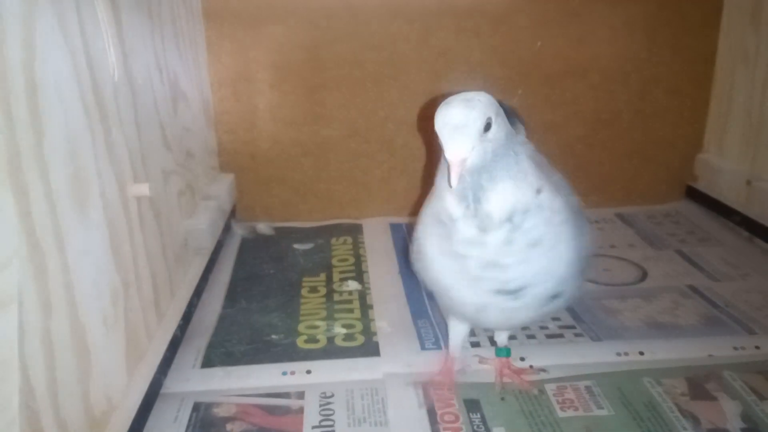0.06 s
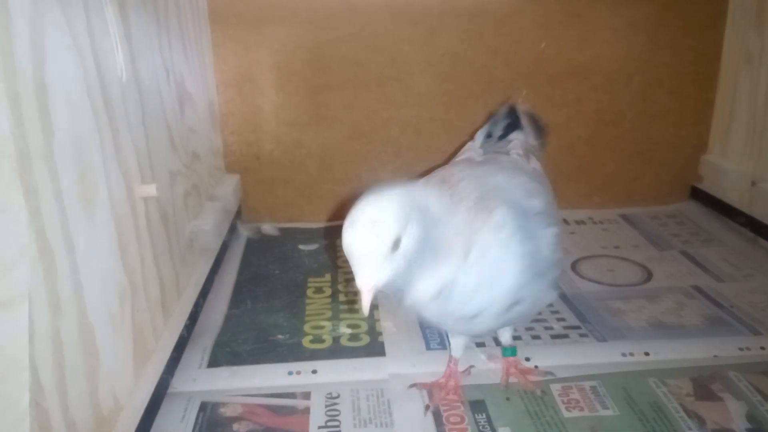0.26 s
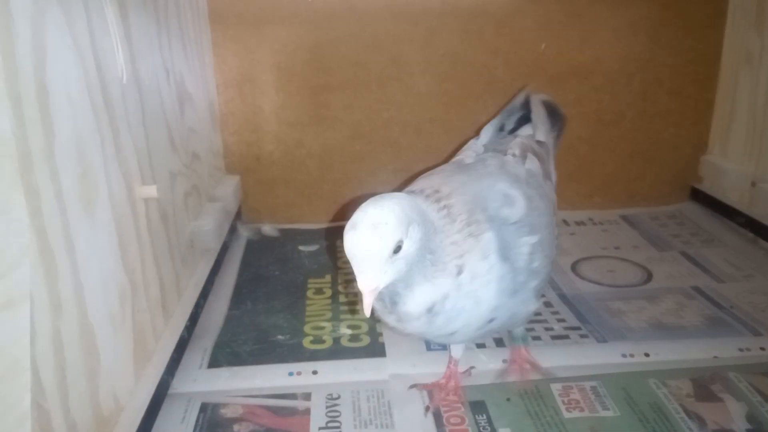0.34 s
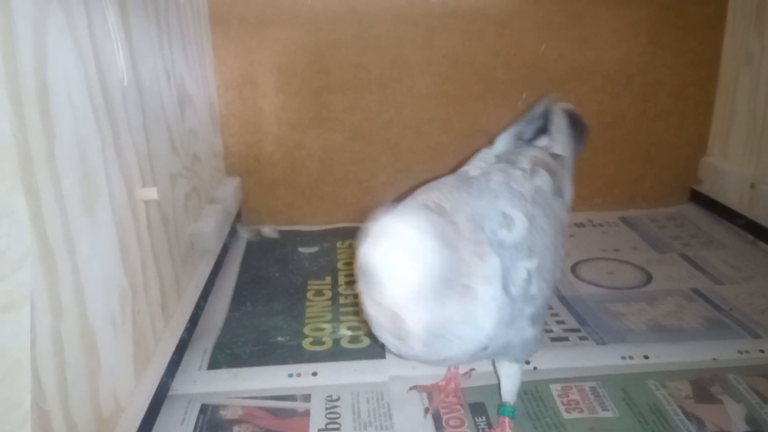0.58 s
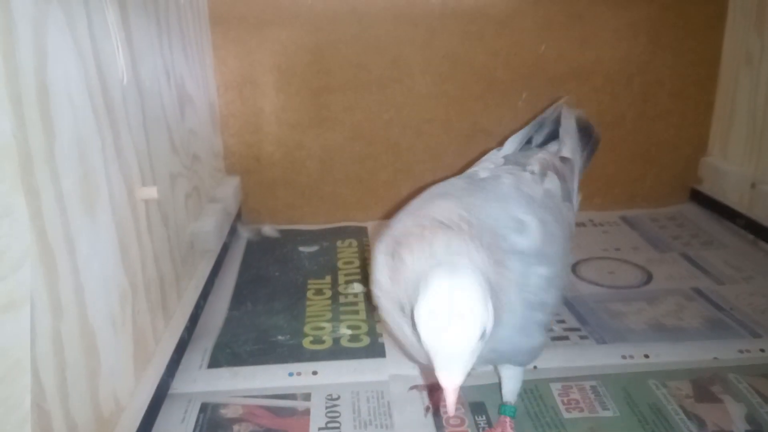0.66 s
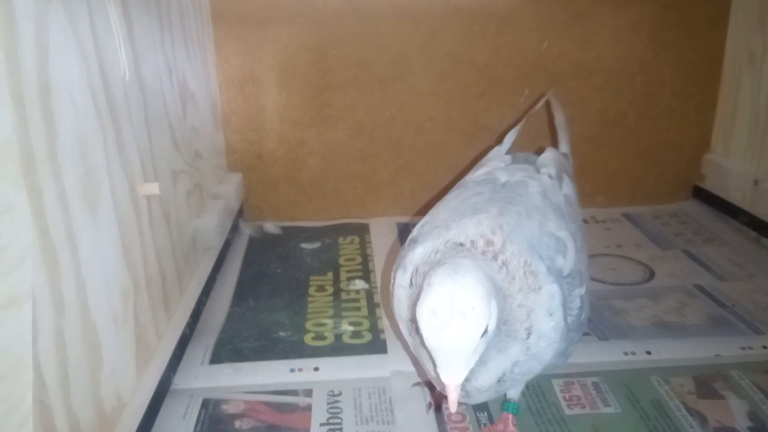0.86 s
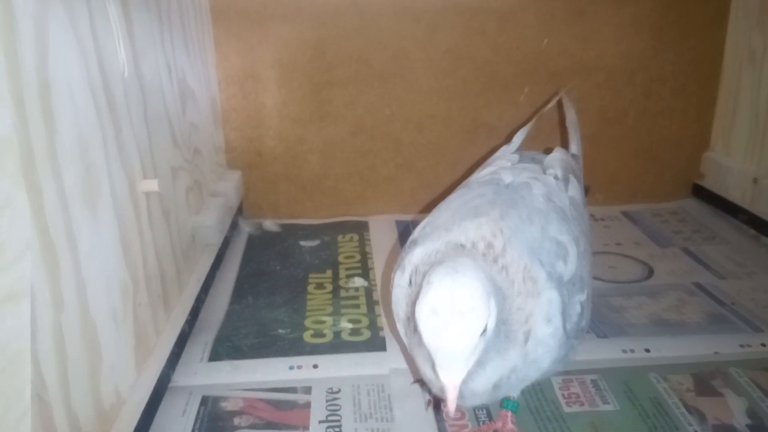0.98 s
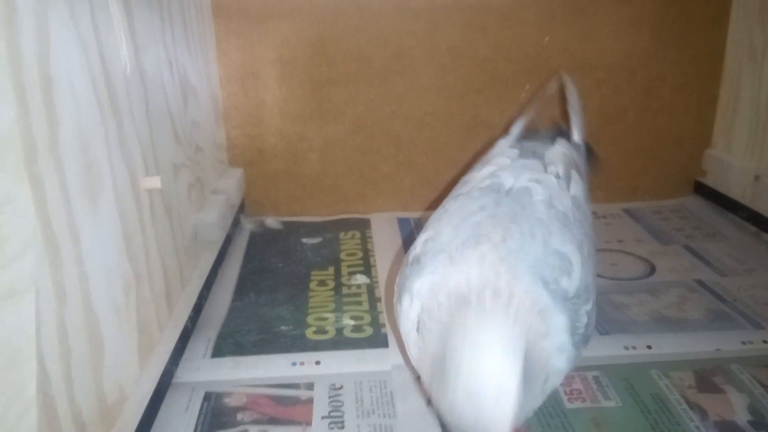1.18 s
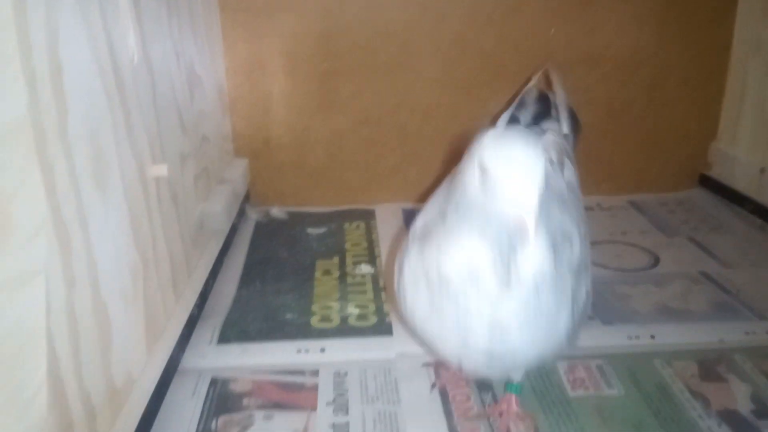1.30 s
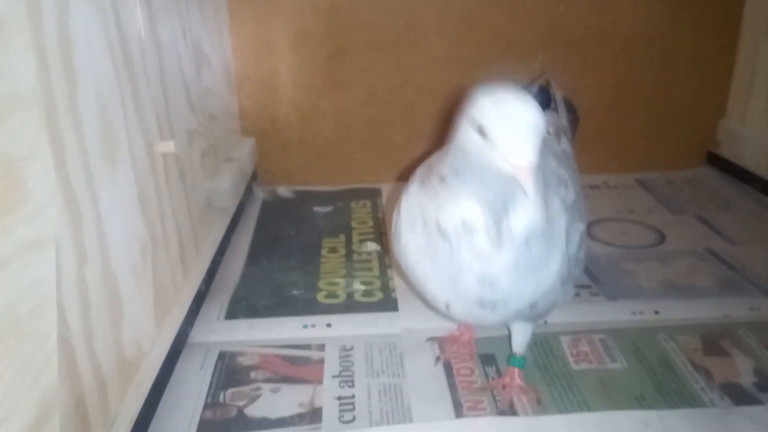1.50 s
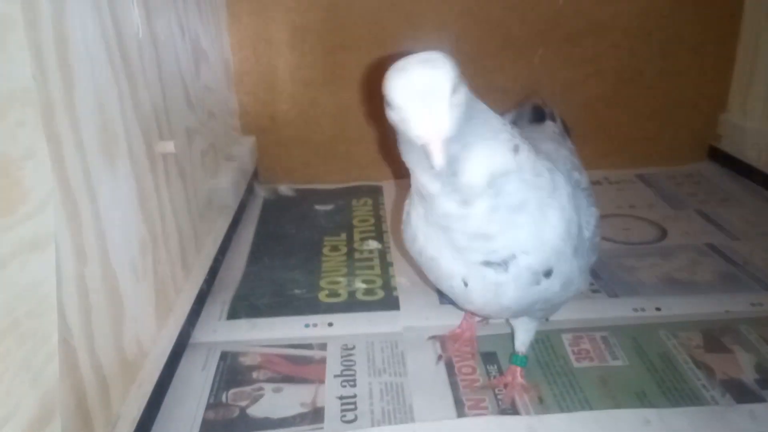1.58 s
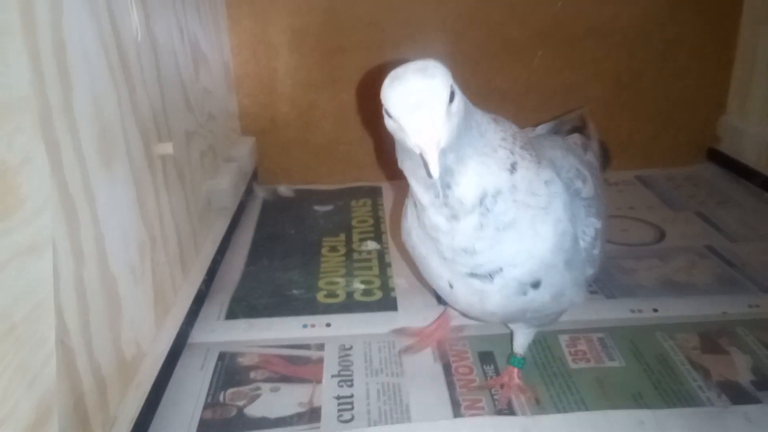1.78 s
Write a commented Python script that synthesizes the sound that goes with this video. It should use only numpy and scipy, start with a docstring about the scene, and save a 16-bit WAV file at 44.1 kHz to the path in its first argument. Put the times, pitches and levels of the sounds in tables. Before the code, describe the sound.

A pigeon's claws and beak tick and scrape on newspaper in a wooden box.

```python
"""Inside a wooden box, a pigeon steps about on newspaper, heard from close by.
Claws and beak tick on the paper by impact and scrape it by stick-slip friction. Footfalls excite
the modes of the floor board, the box booms softly as the weight shifts, and the walls add a short ring.
Feathers rub as the bird lifts its head. Behind it lie a faint wavering hum and the rush of the room."""
import sys
import numpy as np
from scipy import signal
from scipy.fft import rfft, irfft
from scipy.io import wavfile
from scipy.ndimage import uniform_filter1d

SR = 44100
rng = np.random.default_rng(int(sys.argv[2]) if len(sys.argv) > 2 else 0)


def master_out(mix):
    """Clip the mix to full scale and print it as 16-bit PCM to the path in sys.argv[1]."""
    frames = np.transpose(np.atleast_2d(mix))
    ceiling = np.clip(frames, -1, 1)
    pcm = np.round(ceiling * 32767).astype(np.int16)
    wavfile.write(sys.argv[1], SR, pcm)


N = 81585
TIME = np.arange(N) / SR


def undb(db):
    """Decibels to amplitude ratio."""
    return 10 ** (np.asarray(db) / 20)


def unit(x):
    """Normalisation to an rms of 1."""
    return x / np.sqrt(np.mean(x ** 2))


def add(out, at_s, x):
    """Superposition of a sound at a given time."""
    i = int(at_s * SR)
    out[i:i + len(x)] += x[:max(N - i, 0)]


def through(x, response):
    """Convolution with an impulse response."""
    return signal.fftconvolve(x, response)[:len(x)]


def colour(points, tilt_db=0, size=512, treble_hz=5400):
    """Minimum-phase response of unit energy with the given spectrum, its treble tilted per octave."""
    hz, db = np.array(points).T
    octave = np.log2(np.maximum(np.fft.rfftfreq(size, 1 / SR), 1))
    tilt = tilt_db * np.maximum(octave - np.log2(treble_hz), 0)
    cepstrum = irfft(np.log(undb(np.interp(octave, np.log2(hz), db) + tilt)))
    cepstrum[1:size // 2] *= 2
    cepstrum[size // 2 + 1:] = 0
    response = irfft(np.exp(rfft(cepstrum)))
    return response / np.linalg.norm(response)


def tail(t60_s, damp_hz, delay_s=0):
    """Diffuse decay: dense reflections of unit energy, duller above the damping frequency."""
    decay = rng.standard_normal(N) * np.exp(-np.log(1000) * TIME / t60_s) * (TIME >= delay_s)
    response = signal.sosfilt(signal.butter(2, damp_hz, fs=SR, output="sos"), decay)
    return response / np.linalg.norm(response)


def swell(at_s, rise_s, fall_s):
    """Exponential growth to 1 and decay, each with its time constant."""
    t = TIME - at_s
    return np.exp(-np.maximum(-t / rise_s, t / fall_s))


def wander(rate_hz):
    """Slow random fluctuation: smoothed noise with an rms of 1."""
    span = int(SR / rate_hz)
    smoothed = uniform_filter1d(rng.standard_normal(N), span, mode="wrap")
    return unit(uniform_filter1d(smoothed, span, mode="wrap"))


# Spectrum of the room's rush. Each row: frequency in Hz, relative level in dB.
AIR_SPECTRUM = [(25, -34.5), (38, -16.5), (50, -1.5), (80, 0.5), (130, -7.5), (200, -2.5), (350, -15),
                (550, -5), (800, -0.5), (1000, 4.5), (1500, -3.5), (2400, -20), (4000, -24.5),
                (6500, -26.5), (8500, -36), (14000, -35.5), (17000, -30)]
# Bands of the hum. Each row: centre in Hz, width in Hz, level in dB.
HUM_BANDS = [(85.2, 31, -72.5), (981, 45, -72.5), (1157, 30, -75)]

def background(air_db=-61, flicker_db=.5):
    """Broadband noise is heard as a rush of air, narrowband noise as a wavering hum."""
    air = through(rng.standard_normal(N), colour(AIR_SPECTRUM, size=4096))
    air *= undb(air_db + flicker_db * wander(18))
    freqs = np.fft.rfftfreq(N, 1 / SR)
    for hz, width_hz, db in HUM_BANDS:
        band = rfft(rng.standard_normal(N)) / (1 + (2 * (freqs - hz) / width_hz) ** 2)
        air += undb(db) * unit(irfft(band, N))
    return air


# Spectra of the paper, for scrapes and ticks: the touched spot, then the flexing sheet.
# Each row: frequency in Hz, relative level in dB.
SPOT_SPECTRUM = [(200, -24.5), (1000, -22), (1800, -27), (2400, -24), (3100, -11), (3900, 0), (4900, -10),
                 (6100, 1.5), (6900, -4), (7800, -15.5), (8800, -11.5), (11000, -21), (14500, -29),
                 (15800, -51.5)]
FLEX_SPECTRUM = [(100, -9.5), (300, -6.5), (750, -5.5), (1300, 0.5), (1950, 3), (2400, -9), (3200, 4),
                 (4300, -1.5), (7000, -8.5), (16000, -46.5)]
# Claw drags. Each row: peak time, rise and fall in seconds, level in dB, relative flexing in dB.
CLAW_DRAGS = [(0.0321, 0.0015, 0.0026, -41.5, -9.5), (.058, 0.09, 0.062, -71, 5.5),
              (.136, 0.017, 0.0095, -64, 5.5), (0.2214, 0.0026, 0.0015, -43.5, -3.5),
              (0.249, 0.0079, 0.0046, -53, -1.5), (0.284, 0.004, 0.0064, -60.5, 3),
              (0.309, .003, .004, -61, 9.5), (0.736, 0.0039, 0.0016, -48, -29),
              (.7600, 0.0036, .006, -45.5, -9.5), (0.783, 0.0052, 0.0066, -44, 2.5),
              (0.8465, 0.00066, 0.0021, -47, -19), (1.0852, 0.0026, 0.0055, -42.5, -13.5),
              (1.122, 0.0032, 0.0057, -58.5, 6.5), (1.14, 0.0046, 0.004, -44, 3),
              (1.163, 0.0009, 0.0061, -48.5, 9), (1.2291, 0.0045, 0.0022, -58.5, 14),
              (1.250, 0.011, .010, -82, 17.5), (1.447, 0.0052, 0.01, -62, -28),
              (1.825, 0.0026, 0.0085, -63.5, -9)]

def scrapes(slips_per_s=3200, spread_db=3.5, crease_db=2):
    """Stick-slip friction: a dragged claw makes tiny clicks that ring the spot and flex the sheet."""
    out = np.zeros(N)
    spot, sheet = colour(SPOT_SPECTRUM, tilt_db=-5), colour(FLEX_SPECTRUM)
    for at_s, rise_s, fall_s, db, flex_db in CLAW_DRAGS:
        pressure = undb(db) * swell(at_s, rise_s, fall_s)
        slips = (rng.random(N) < slips_per_s / SR) * rng.choice([-1, 1], N)
        slips = slips * undb(spread_db * rng.standard_normal(N))
        crease_ring = undb(crease_db) * tail(t60_s=.0072, damp_hz=15200)[:SR // 20]
        drag = pressure * (slips + through(slips, crease_ring))
        rasp = unit(through(drag, spot)) + undb(flex_db) * unit(through(drag, sheet))
        out += np.sqrt(np.mean(pressure ** 2)) * rasp
    return out


# Booms of the box. Each row: peak time, rise and fall in seconds, level in dB, frequency in Hz.
WEIGHT_SHIFTS = [(.625, 0.017, .012, -62, 189.3), (.410, 0.023, 0.0115, -62.5, 175),
                 (.065, 0.03, .012, -63.5, 90), (.165, 0.051, 0.032, -55.5, 87.2),
                 (.243, 0.0091, 0.025, -61, 88.3), (.308, 0.034, 0.046, -55.5, 148),
                 (.355, .012, 0.029, -50, 101.3), (0.414, .03, 0.028, -53, 74.85),
                 (0.569, 0.013, 0.026, -64.5, 88), (0.731, 0.086, 0.03, -58, 72),
                 (.792, 0.016, 0.0082, -46.5, 100), (.848, 0.0088, 0.022, -47.5, 97.6),
                 (1.171, 0.029, 0.037, -50.5, 89.2), (1.245, .012, 0.04, -53, 96.7),
                 (1.312, 0.024, 0.043, -55, 88.2), (1.460, 0.024, 0.015, -58.5, 78.3),
                 (1.545, 0.023, 0.026, -57.5, 86.1), (1.662, 0.039, 0.013, -50.5, 81.7)]

def booms():
    """Resonance: the box swells with a low, wavering tone as the bird shifts its weight."""
    return sum(undb(db) * swell(at_s, rise_s, fall_s) * np.sin(2 * np.pi * hz * TIME + wander(58))
               for at_s, rise_s, fall_s, db, hz in WEIGHT_SHIFTS)


# Taps of claw or beak. Each row: start in seconds, level in dB, treble tilt in dB per octave,
# relative flexing in dB.
PAPER_TAPS = [(.0715, -44.5, -13, -9.5), (0.0764, -46.5, -9, -7), (0.0975, -57, -5, 1),
              (0.1143, -34, -7, -5), (.2170, -37.5, -9, -7.5), (0.2191, -50, -28, -2.5),
              (0.2974, -28.5, -8.5, -20.5), (0.2979, -13, 2.5, -36), (.3071, -31.5, 25, -20),
              (0.734, -35.5, -5, -27), (.7587, -34, 9, -13.5), (0.7648, -41.5, 5.5, -0.5),
              (0.7856, -22, 10, -14.5), (.8010, -47, 5, -1), (.8463, -32, -3, -4.5), (1.0855, -38, 4, -17),
              (1.1393, -23.5, 8, -10), (1.164, -43, 3, -11.5), (1.1684, -45, 9, -9),
              (1.2211, -34.5, 12.5, -6.5), (1.2271, -32.5, -5, -8), (1.2312, -37.5, 7, -4),
              (1.8232, -55, -7, 2.5)]

def ticks(shiver_db=-4):
    """Impulse excitation: tapped paper snaps, shivers briefly and flexes with a duller crackle."""
    out = np.zeros(N)
    for at_s, db, tilt_db, flex_db in PAPER_TAPS:
        snap = colour(SPOT_SPECTRUM, tilt_db)
        shiver = undb(shiver_db) * tail(t60_s=.007, damp_hz=15000, delay_s=.0004)[:SR // 20]
        shiver[0] += 1  # the impact itself
        add(out, at_s, undb(db) * signal.fftconvolve(shiver, snap / np.abs(snap).max()))
        flex = signal.fftconvolve(tail(t60_s=.01, damp_hz=9000)[:SR // 20], colour(FLEX_SPECTRUM))
        add(out, at_s, undb(db + flex_db) * flex / np.abs(flex).max())
    return out


# Modes of the floor board. Each row: frequency in Hz, relative level in dB, 60 dB decay time in seconds.
BOARD_MODES = [(101.3, -2.5, 0.15), (125, 0, 0.079), (200.4, -11.5, 0.2), (249, -11, 0.13),
               (330, -14.5, 0.26), (471, 0, 0.063), (540.6, -14.5, 0.29), (661.6, 1, 0.044),
               (677, -11, 0.052), (735.5, -9, 0.27), (850, -3, 0.082), (981, -15.5, .07), (1236, -5, .06),
               (1508, 1, 0.19), (1635, 14, .08)]
# Footfalls. Each row: start in seconds, peak level in dB, favoured pitch in Hz, its spread in octaves.
FOOTFALLS = [(.2180, -40.5, 470, 0.14), (.2200, -45, 740, 0.4), (.2250, -50.5, 215, 0.2),
             (.2370, -48, 150, 0.58), (.2420, -51.5, 656, 0.49), (.2830, -51, 320, 0.37),
             (0.301, -46, 394, 1.2), (.3045, -50.5, 182.7, 0.88), (.7790, -49.5, 201, .7),
             (.7835, -43.5, 640, 0.73), (0.7923, -46, 182, 0.72), (.8020, -43, 593, 0.64),
             (.8300, -58, 520, 0.47), (0.8456, -57, 250, 1.3), (1.1243, -52, 273, 0.31),
             (1.1410, -40.5, 324, 1.3), (1.165, -41.5, 600, 0.83), (1.1742, -43.5, 254, 0.85),
             (1.2263, -50, 453, 0.24), (1.2440, -48.5, 430, 0.54)]

def knocks(spread_db=3, detune=.0096, pad_s=.001):
    """Modal vibration: a footfall rings the board, and each spot favours the modes near one pitch."""
    out, t = np.zeros(N), TIME[:SR // 4]
    hz, mode_db, t60_s = np.array(BOARD_MODES).T[:, :, None]
    for at_s, db, spot_hz, octaves in FOOTFALLS:
        strength, shift, polarity = rng.standard_normal((3, len(BOARD_MODES), 1))
        spot_db = -6 * (np.log2(hz / spot_hz) / octaves) ** 2
        gain = np.sign(polarity) * undb(mode_db + spread_db * strength + spot_db)
        modes = gain * np.sin(2 * np.pi * hz * (1 + detune * shift) * t)
        ring = (modes * np.exp(-np.log(1000) * t / t60_s)).sum(axis=0)
        ring *= 1 - np.exp(-t / pad_s)  # the soft pad of the foot eases into the board
        add(out, at_s, undb(db) * ring / np.abs(ring).max())
    return out


# Rubs as the head moves. Each row: peak time, rise and fall in seconds, level in dB.
FEATHER_RUBS = [(0.413, .012, 0.013, -68), (1.305, .03, 0.24, -79.5), (1.520, 0.21, 0.15, -78)]
# Spectrum of the rubbing. Each row: frequency in Hz, relative level in dB.
FEATHER_SPECTRUM = [(1500, -23.5), (2500, -3.5), (4000, -0.5), (4700, 0.5), (5200, -8), (5900, 3.5),
                    (6700, -2), (8000, -19.5), (9200, -13.5), (11000, -27), (16000, -18.5)]
# Squeaks within it. Each row: peak time and half length in seconds, pitch in Hz, level in dB.
FEATHER_SQUEAKS = [(1.285, .04, 6630, -73), (1.330, .04, 9220, -78), (1.365, .04, 5870, -75),
                   (1.340, .06, 4900, -78), (1.550, .05, 5890, -77)]

def feathers(octaves_per_s=-.3, jitter=.014):
    """Sliding friction: feather on feather gives a faint hiss and thin, slowly sinking squeaks."""
    pressure = sum(undb(db) * swell(at_s, rise_s, fall_s) for at_s, rise_s, fall_s, db in FEATHER_RUBS)
    out = pressure * through(rng.standard_normal(N), colour(FEATHER_SPECTRUM))
    for at_s, half_s, hz, db in FEATHER_SQUEAKS:
        t = TIME - at_s
        pitch = hz * 2 ** (octaves_per_s * t) * (1 + jitter * wander(500))
        envelope = undb(db + 2 * wander(99)) * np.exp(-(t / half_s) ** 2)
        out += envelope * np.sin(2 * np.pi * np.cumsum(pitch) / SR)
    return out


# Spectrum that the walls reflect. Each row: frequency in Hz, relative level in dB.
WALL_SPECTRUM = [(200, 3), (1500, -1), (2400, 6.5), (3800, -2), (4900, -1), (6000, 0.5), (7400, 0.5),
                 (9000, 0.5), (16000, -5)]

def reflections(sound, response):
    """Reverberation: the walls return a decaying, coloured copy of the sound."""
    return through(through(sound, response), colour(WALL_SPECTRUM))


def scene():
    """Superposition of the sources, the quick ring of the box and the fainter room beyond."""
    paper, board = ticks() + scrapes(), knocks()
    box = undb(-13.5) * tail(t60_s=.092, damp_hz=9030, delay_s=.0014)
    room = undb(-24.5) * tail(t60_s=.25, damp_hz=7500, delay_s=.012)
    bird = paper + reflections(paper, box) + board
    return (bird + reflections(bird, room) + feathers() + booms() + background())[None]


def record(dry):
    """Band limiting: a steep low-pass filter removes the treble above 16.8 kHz."""
    return signal.sosfilt(signal.ellip(10, .2, 70, 16800, fs=SR, output="sos"), dry)


dry = scene()
out = record(dry)
master_out(out)
```